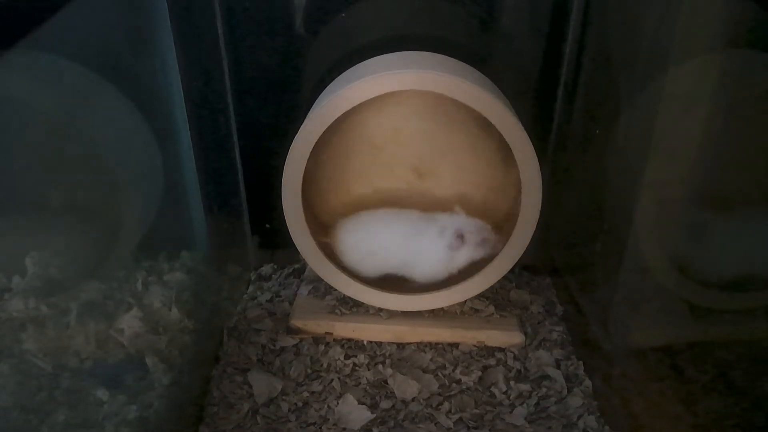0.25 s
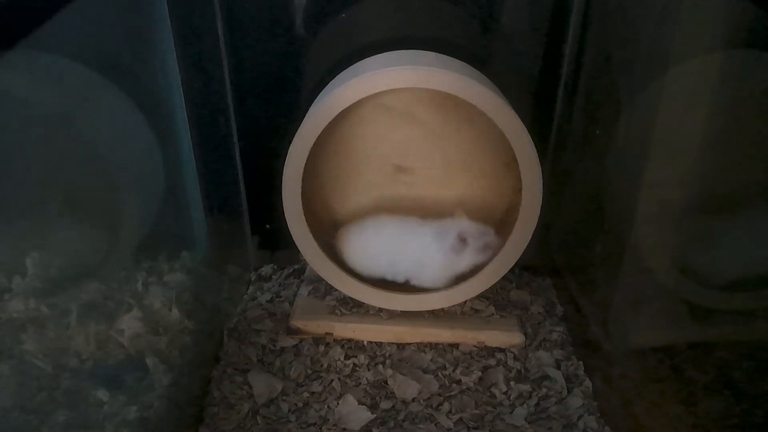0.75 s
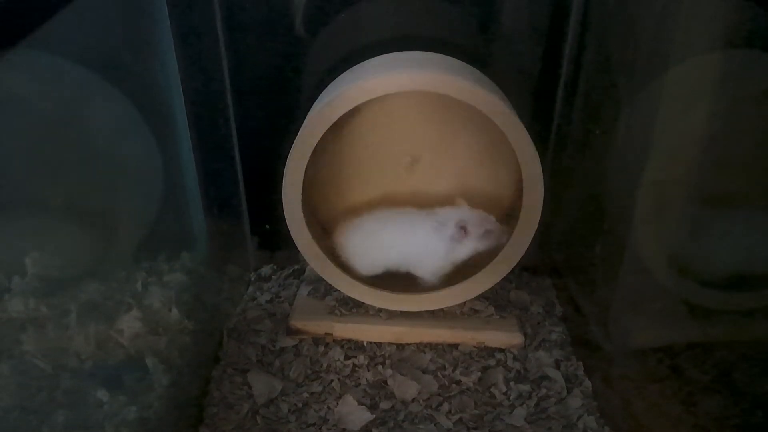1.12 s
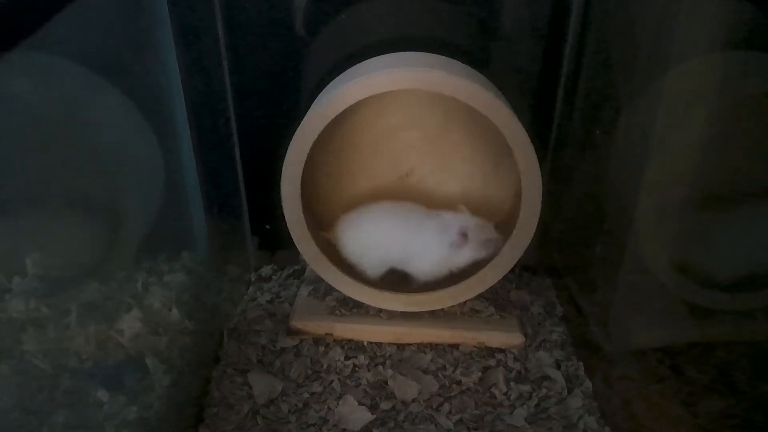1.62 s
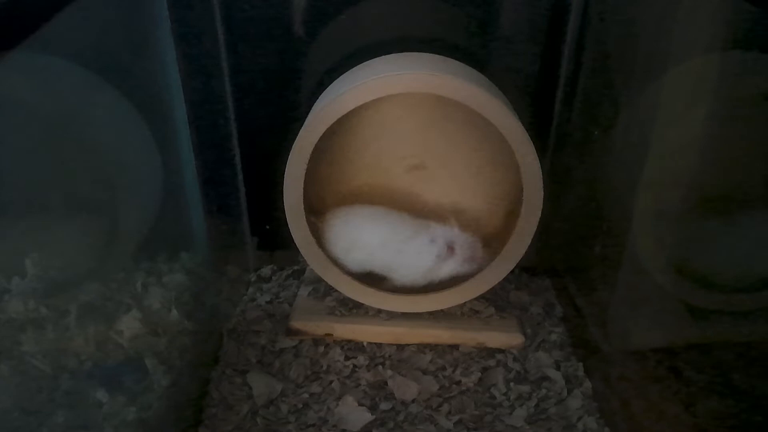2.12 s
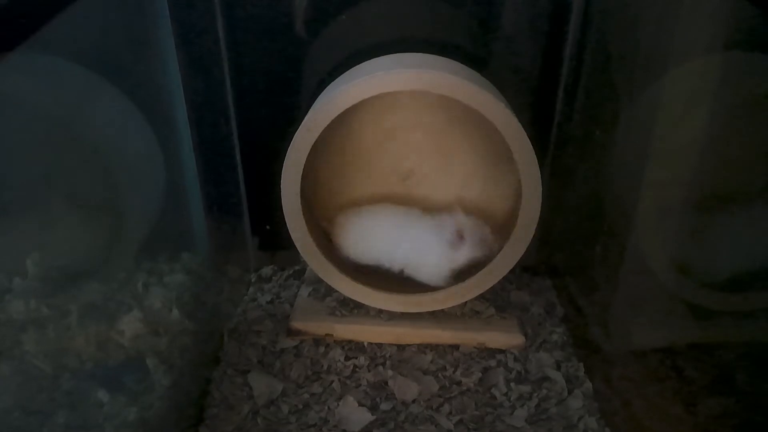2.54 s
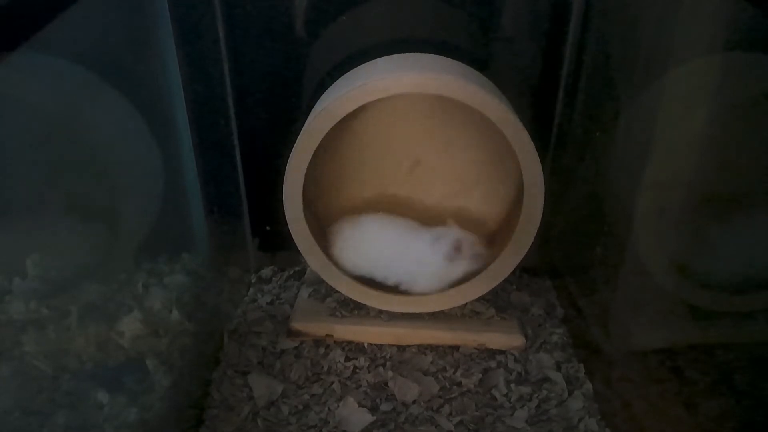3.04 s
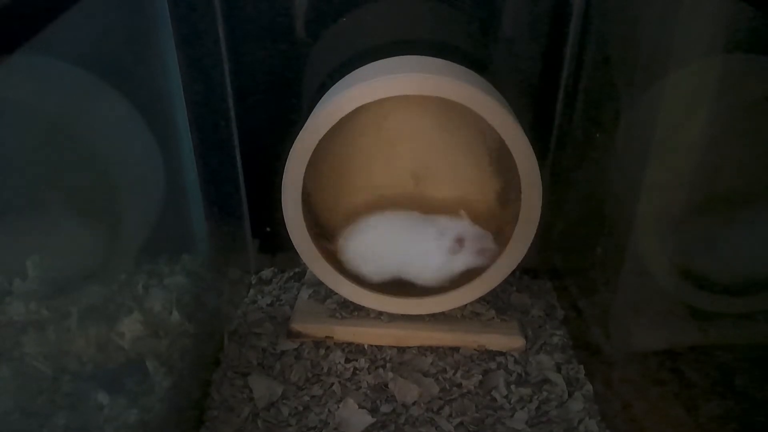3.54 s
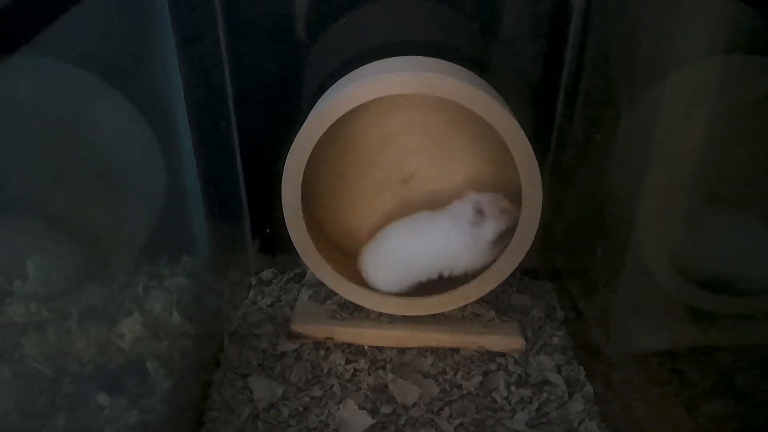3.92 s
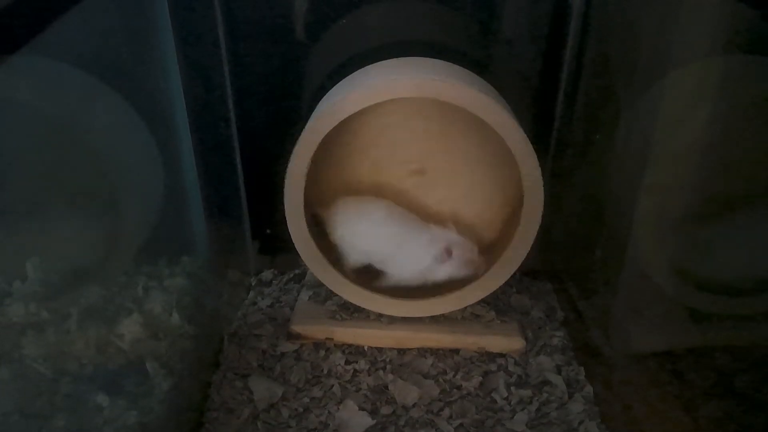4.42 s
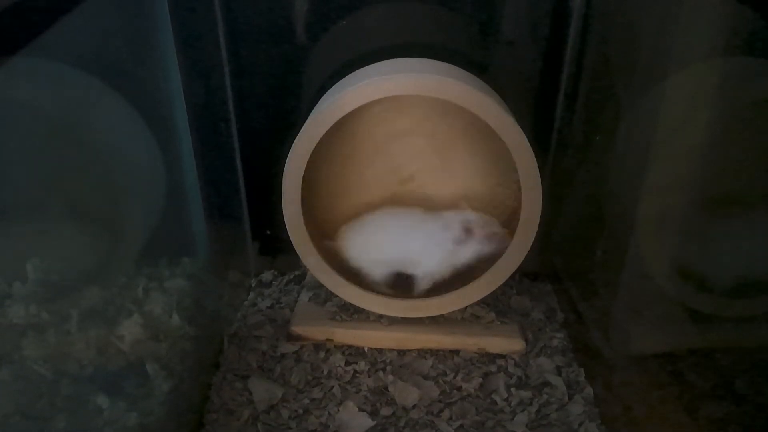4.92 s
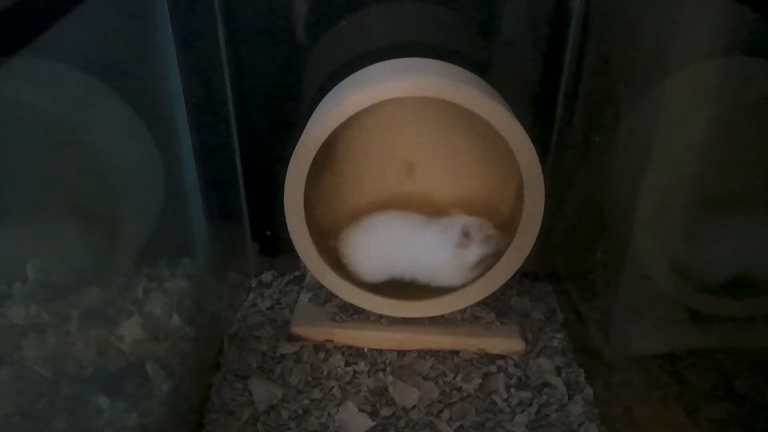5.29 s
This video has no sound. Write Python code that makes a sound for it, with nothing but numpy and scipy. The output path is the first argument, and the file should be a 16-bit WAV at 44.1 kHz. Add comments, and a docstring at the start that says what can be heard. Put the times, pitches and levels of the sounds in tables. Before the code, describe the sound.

Close up, a hamster runs in a hollow wooden wheel. Light irregular claw ticks and soft fur brushing come first, then harder paw thumps and rumbling, a calmer spell, and another short burst of thumps. Faint squeaks and taps appear among them. A steady low hum and gentle ventilation noise fill the quiet room; stereo microphone beside a glass tank.

```python
"""Close beside a glass tank in a quiet room, a two-port stereo microphone hears a hamster in a wooden wheel.
From the start a mains hum and air noise lie under ticking claws (noise grit and a ring), brushing fur,
faint axle squeaks and short pitched taps of the wood (roughened tones). From about 1.4 s the run grows hard:
paws thump the drum (pushes into decaying modes) over rumbling noise. It eases near 2.9 s, then thumps again
from about 4.3 to 4.9 s. Last come a few claw ticks and scuffs (noise swells), with the rumble rising."""
import sys
import numpy as np
from scipy import signal
from scipy.fft import rfft, irfft, next_fast_len
from scipy.io import wavfile

SR = 44100
rng = np.random.default_rng(int(sys.argv[2]) if len(sys.argv) > 2 else 0)


def inscribe(sig):
    """Save sig as 16-bit PCM at rate SR to the path in sys.argv[1].

    A 1-D sig is mono; a 2-D sig holds one channel per row.
    Samples are clipped to [-1, 1] before scaling.
    """
    pcm = np.round(np.clip(np.atleast_2d(sig).T, -1, 1) * 32767)
    wavfile.write(sys.argv[1], SR, pcm.astype(np.int16))


N = 245195
TIME = np.arange(N) / SR
SURGE_HZ = 12  # fastest rate of the random surges


def amp(db):
    """Turns dB into an amplitude factor."""
    return 10 ** (np.asarray(db) / 20)


def unit(x):
    """Scales to rms 1."""
    return x / np.sqrt(np.mean(x ** 2) + 1e-20)


def curve(rows):
    """Draws a time curve at every sample."""
    return np.interp(TIME, *np.transpose(rows))


def across(points, size):
    """Reads a spectrum table at the bins of an FFT of this size, along log frequency."""
    hz, value = np.transpose(points)
    bins_hz = np.fft.rfftfreq(size, 1 / SR)
    return np.interp(np.log(bins_hz + 1), np.log(hz + 1), value)


def colour(x, points, lead=((1, 0), (2, 0))):
    """Filters by a table of (Hz, dB), and turns the phase by a table of (Hz, radians)."""
    size = next_fast_len(N + 4096)
    response = amp(across(points, size)) * np.exp(1j * across(lead, size))
    return irfft(rfft(x, size) * response, size)[..., :N]


def highpass(x, hz):
    """Removes the sound below an edge, at 24 dB an octave."""
    return signal.sosfilt(signal.butter(4, hz, "high", fs=SR, output="sos"), x)


def noise():
    """Draws two unrelated channels of white noise."""
    return rng.standard_normal((2, N))


def drift(rate_hz):
    """Wanders at random with rms 1, mostly slower than the given rate."""
    size = 4096
    hz = np.fft.rfftfreq(size, N / SR / size)
    slow = irfft(rfft(rng.standard_normal(size)) / (1 + (hz / rate_hz) ** 4))
    return unit(np.interp(TIME, np.linspace(0, N / SR, size), slow))


def add(mix, s, sound):
    """Mixes a sound in place from s seconds on."""
    part = mix[..., max(round(s * SR), 0):][..., :sound.shape[-1]]
    part += sound[..., :part.shape[-1]]


# Likeness of the two microphone ports. Each row: frequency in Hz, correlation from -1 to 1.
PORT_LIKENESS = [(20, .97), (180, .97), (330, .93), (550, .62), (1000, -.15), (2000, -.1), (5000, 0)]


def spread(pair):
    """Two unrelated signals become a stereo pair that shares its bass."""
    size = next_fast_len(N + 4096)
    a, b = rfft(pair, size)
    alike = across(PORT_LIKENESS, size)
    mid = a * np.sqrt((1 + alike) / 2)
    side = b * np.sqrt((1 - alike) / 2)
    return irfft([mid + side, mid - side], size)[:, :N]


TANK_ABOVE_HZ = 500  # lower edge of the reflections; below it the sound stays dry


def tank(x, t60, wet_db):
    """Dense reflections between the glass walls, different at each port; the bass stays dry."""
    t = np.arange(SR // 2) / SR
    tail = rng.standard_normal((2, len(t))) * np.exp(-np.log(1000) * t / t60) * (t > .002)
    tail /= np.linalg.norm(tail, axis=1, keepdims=True)
    tail = highpass(tail, TANK_ABOVE_HZ)
    reflected = signal.oaconvolve(np.atleast_2d(x), tail, axes=1)[:, :N]
    return x + amp(wet_db) * spread(reflected)


def push(contact_s):
    """A smooth push of unit area."""
    shape = np.sin(np.pi * np.minimum(np.arange(1024) / SR / contact_s, 1)) ** 2
    return shape / shape.sum()


# Modes of the hollow drum on its stand, before any variation from spot to spot.
# Each row: frequency in Hz, relative level in dB, 60 dB decay time in seconds.
DRUM_MODES = [(140, -5.3, 0.15), (166, -3.8, 0.15), (322, -13, 0.09), (352, -2, 0.08), (420, 0.5, 0.075),
              (572, -6, 0.05), (700, -9, 0.06), (805, -15, 0.034), (933, -1, 0.07)]
MODE_SPREAD_DB, MODE_DETUNE = 2.0, .015  # largest change of level and share of pitch from paw to paw


def drum(force, varied=0, radiate_hz=95):
    """The hollow wheel rings in its modes, varied from spot to spot; it is too small to radiate deep bass."""
    t = np.arange(SR // 4) / SR
    ring = np.zeros(len(t))
    chance = varied * rng.uniform(-1., 1., (len(DRUM_MODES), 2))
    for (hz, db, t60), (louder, sharper) in zip(DRUM_MODES, chance):
        mode = np.sin(2 * np.pi * hz * (1 + MODE_DETUNE * sharper) * t)
        ring += amp(db + MODE_SPREAD_DB * louder) * 1e-3 ** (t / t60) * mode
    return signal.oaconvolve(force, highpass(ring, radiate_hz))[:N]


# Footfalls that knock the drum against its stand. Each row: start in seconds, relative level of the knock
# in dB, relative level of the body weight that follows in dB, contact time in seconds (long is dull).
FOOTFALLS = [(0.17, -38, -68, 0.0022), (0.81, -48, -65, 0.0014), (1.018, -36, -54, 0.0019),
             (1.112, -66, -40, 0.0014), (1.491, -34.5, -34, 0.0023), (1.536, -38.5, -43, 0.0025),
             (1.647, -50.5, -42, 0.0015), (1.783, -27.5, -34, 0.0019), (1.7948, -46, -45, 0.0015),
             (1.822, -40, -38, 0.0029), (1.843, -36, -49, 0.0017), (1.877, -48, -37, 0.0024),
             (1.937, -50, -41, 0.0024), (2.002, -44, -50, .0015), (2.0102, -33, -42, 0.002),
             (2.077, -44, -40, 0.0015), (2.278, -57, -50, 0.0013), (2.379, -35, -30, 0.0022),
             (2.3954, -30.5, -29, 0.002), (2.428, -37, -41, .003), (2.451, -35.5, -40, 0.0026),
             (2.465, -38, -28, 0.0017), (2.489, -40, -32, 0.0018), (2.527, -36, -45, 0.0024),
             (2.548, -73, -31, 0.0019), (2.888, -52, -57, 0.0022), (3.282, -44, -68, 0.0023),
             (3.428, -34, -39, 0.0027), (4.289, -37, -31, 0.0026), (4.516, -46, -27.5, 0.0021),
             (4.579, -48, -33, 0.0014), (4.644, -42, -34.5, 0.0024), (4.8335, -28, -34, 0.0017),
             (4.893, -42.5, -38, 0.0023)]
WEIGHT_S, SETTLE_S = 0.0052, 0.01176  # contact time of the weight, and its delay after the knock
REBOUND_S, REBOUND_DB = 0.005964, -4  # the drum drops back on its stand: mean delay, level to the knock
REBOUND_SCATTER = .03  # largest share by which that delay varies


def thumps(knock_db=0.4, weight_db=-0.7):
    """A short knock reaches the higher modes and rebounds; then the body's weight lands, soft and low."""
    out = np.zeros(N)
    for s, db, body_db, contact_s in FOOTFALLS:
        force = np.zeros(2048)
        knock = amp(db + knock_db) * push(contact_s)
        rebound_s = REBOUND_S * (1 + REBOUND_SCATTER * rng.uniform(-1, 1))
        add(force, 0, knock)
        add(force, rebound_s, amp(REBOUND_DB) * knock)
        add(force, SETTLE_S, amp(body_db + weight_db) * push(WEIGHT_S))
        add(out, s, drum(force, varied=1))
    return tank(out, t60=0.042, wet_db=-3)


# The dry wooden edge of a hard knock. Each row: frequency in Hz, relative level in dB.
CRACK_COLOUR = [(300, -30), (700, 11), (1000, 3), (1600, 2), (2600, -10), (6000, -40)]


def cracks(level_db=-24.5, decay_s=0.018, hard_db=-28, steepness=1.6):
    """Knocks also rattle the stand, as decaying noise; the rattle grows faster than the blow."""
    t = np.arange(4096) / SR
    envelope = np.zeros(N)
    for s, db, *_ in FOOTFALLS:
        rattle_db = hard_db + level_db + steepness * (db - hard_db)
        add(envelope, s, amp(rattle_db) * np.exp(-t / decay_s))
    return envelope * unit(colour(spread(noise()), CRACK_COLOUR))


# Claws that drag. Each row: start in seconds, length in seconds, mean relative level in dB,
# middle pitch in Hz, relative treble in dB.
CLAW_DRAGS = [(1.247, .024, -61, 4600, -11), (1.815, .012, -45.5, 5120, -18), (2.578, .008, -48, 3960, -16),
              (3.397, .011, -51, 4820, -17), (3.431, .015, -52, 4000, -16), (4.035, .024, -52, 4880, -13),
              (4.085, .009, -49, 2500, -24), (4.487, .008, -49, 4440, -16), (4.773, .016, -53.5, 5330, -13),
              (4.883, .014, -44, 4290, -16), (5.17, .009, -48.5, 3850, -22), (5.297, .02, -52, 4060, -16),
              (5.447, .009, -61, 3870, -18)]
SLIP_GAP_S, SLIP_DECAY_S, SLIP_SPREAD_DB, SLIP_RING_DB = .003, 0.0022, 4, -7


def skids():
    """Each drag is a quick, uneven run of slips, as rows like those of CLAW_STRIKES."""
    rows = []
    for s, length, db, hz, treble_db in CLAW_DRAGS:
        chance = rng.uniform(-1, 1, (32, 3))
        slips = chance[:int(length / SLIP_GAP_S) + 1]
        for k, (late, force, spot) in enumerate(slips):
            slip_s = s + (k + late / 3) * SLIP_GAP_S
            slip_db = db + SLIP_SPREAD_DB * force
            rows.append((slip_s, slip_db, hz * 2 ** (spot / 2), treble_db, SLIP_DECAY_S, SLIP_RING_DB))
    return rows


# the faintest touches: relative level and its spread, pitch, relative treble, decay time
CRACKLE_DB, CRACKLE_SPREAD_DB = -66, 6
CRACKLE_HZ, CRACKLE_TREBLE_DB, CRACKLE_DECAY_S = 3370, -16, 0.0013


def crackle(count=130):
    """Faint touches of the claws at random moments, as rows like those of CLAW_STRIKES."""
    rows = []
    for when, force, spot in rng.uniform(-0.87, 1, (count, 3)):
        s = (when + 1) / 2 * N / SR
        db = CRACKLE_DB + CRACKLE_SPREAD_DB * force
        hz = CRACKLE_HZ * 2 ** (spot / 2)
        rows.append((s, db, hz, CRACKLE_TREBLE_DB, CRACKLE_DECAY_S, SLIP_RING_DB))
    return rows


# The clearest claw strikes on the wood. Each row: start in seconds, relative level in dB, pitch of the spot
# in Hz, relative treble in dB, nominal decay time in seconds, ring against the grit in dB.
CLAW_STRIKES = [(.0239, -52, 5270, -22, 0.0023, -6), (.1294, -47, 5200, -11, .003, -11),
                (.2035, -49, 6100, -13, .0035, -18), (.2817, -42.5, 4910, -26, 0.0022, -6),
                (.323, -48, 3700, -12, .0025, -10), (.4417, -47, 4870, -9, .003, -8),
                (.4856, -45, 3230, -19, 0.0026, -22), (.5995, -46, 5750, -24, .0014, -3),
                (.6025, -47.5, 4870, -24, 0.0022, -4), (.6494, -49, 3830, -24, 0.0016, 0),
                (.782, -50, 5250, -10, .003, -10), (.8003, -44.5, 2920, -24, 0.0021, -7),
                (.801, -48, 4400, -22, 0.0022, 0), (.9255, -45.5, 4860, -23, .0033, -14),
                (.971, -46, 2760, -25, 0.0023, -11), (1.1113, -43.5, 5230, -16, 0.0029, -14),
                (1.1855, -49.5, 5150, -25, 0.0033, -5), (1.2593, -50, 5500, -14, .003, -5),
                (1.2793, -44.5, 4260, -20, 0.0021, -5), (1.3775, -46, 2900, -16, 0.003, -15),
                (1.4023, -44, 2400, -9, .0025, -10), (1.4615, -45.5, 5850, -18, 0.003, -12),
                (1.5695, -42, 4760, -32, 0.0021, -5), (1.606, -43, 5330, -19, 0.002, -16),
                (1.6906, -45, 5100, -18, 0.0034, -10), (1.7228, -62, 3400, -11, 0.0018, -12),
                (1.8192, -49, 3780, -18, 0.0044, -5), (1.8245, -46, 4950, -15, .003, -1),
                (1.8285, -44.5, 3000, -18, 0.0028, -5), (1.9228, -49, 6010, -21, 0.0029, -1),
                (2.055, -45, 4400, -13, 0.0032, -9), (2.0916, -44.5, 2590, -13, .0022, -9),
                (2.183, -46, 5000, -17, .0026, -16), (2.3222, -46, 2700, -13, .0035, -14),
                (2.3435, -43.5, 5660, -22, 0.0029, -18), (2.4203, -44, 3750, -18, .003, -7),
                (2.5537, -52, 5760, -20, .0025, -6), (2.5873, -48, 4200, -16, 0.0024, -20),
                (2.7, -53, 2620, -24, 0.0033, -5), (2.7512, -46.5, 3710, -28, 0.0038, -1),
                (2.8385, -49, 5430, -17, .003, -12), (2.8704, -47, 2710, -10, 0.0033, -3),
                (3.0944, -44.5, 3300, -19, 0.0027, -7), (3.0948, -43, 6120, -24, 0.0021, -1),
                (3.0955, -49, 5250, -24, .0019, -3), (3.3288, -48.5, 3360, -22, 0.0023, -12),
                (3.553, -45, 4520, -10, 0.003, -17), (3.7165, -43.5, 5100, -20, 0.0025, -10),
                (3.7819, -46, 2600, -11, .002, -13), (3.8833, -53, 4600, -16, .003, -8),
                (4.0773, -47, 2470, -21, 0.0022, -16), (4.0958, -47, 3510, -24, 0.01, -11),
                (4.1862, -45.5, 5070, -18, 0.0031, -13), (4.2313, -49, 2970, -14, .002, -8),
                (4.349, -45.5, 4020, -10, 0.0032, -5.5), (4.3935, -40, 3140, -30, 0.0017, -4),
                (4.3938, -45.5, 4430, -30, .0015, 0), (4.6435, -45, 5000, -23, 0.0027, -10),
                (4.7255, -52, 4960, -19, 0.0036, -10), (4.9952, -50, 4040, -14, 0.0032, -22),
                (5.417, -41, 4000, -28, 0.0014, -5), (5.4172, -42.5, 5700, -28, 0.0015, -6),
                (5.4312, -43.5, 3610, -18, 0.0031, 8)]
# Body of the grit. Each row: frequency in Hz, relative level in dB.
GRIT_BODY = [(700, -2), (1500, 8.5), (2500, -2), (5800, -4), (7200, 4.5), (9000, 0)]
# Treble of the grit. Each row: frequency in Hz, relative level in dB.
GRIT_TREBLE = [(5000, -30), (7500, -3), (10000, 0), (15500, 0)]
CLAW_RISE_S, CLAW_ALIKE = 0.00081, .3  # onset time; share of the grit's power that both ports hear alike
SPOT_DB, SPOT_OCTAVES = 8.5, 1  # grit is lifted around the pitch of the spot, over this width
SPOT_RING_DB = 2  # a spot that rings well colours the grit more
GRIT_LONGEST_S, RING_OUTLASTS = .003, 1.2  # cap on the grit's decay; the ring's decay in nominal decay times


def claws(level_db=3, treble_level_db=13):
    """A claw strikes: a dry burst of grit, coloured by the spot it hits; that spot rings on a little longer."""
    size = 2048
    out, t = np.zeros((2, N)), np.arange(size) / SR
    bins_hz = np.fft.rfftfreq(size, 1 / SR) + 1
    body = amp(across(GRIT_BODY, size))
    treble = unit(amp(across(GRIT_TREBLE, size)))
    for s, db, hz, treble_db, decay, ring_db in list(CLAW_STRIKES) + crackle() + skids():
        nearness = np.exp(-(np.log2(bins_hz / hz) / SPOT_OCTAVES) ** 2)
        spot = amp((SPOT_DB + SPOT_RING_DB * amp(ring_db)) * nearness)
        tone = np.hypot(unit(body * spot), amp(treble_db + treble_level_db) * treble)
        white = rng.standard_normal((3, size))
        ports = np.sqrt(CLAW_ALIKE) * white[0] + np.sqrt(1 - CLAW_ALIKE) * white[1:]
        grit = irfft(rfft(ports) * tone)
        phase = rng.random((2, 1)) / 2  # in turns, another at each port
        ring = amp(ring_db) * np.sqrt(2) * np.sin(2 * np.pi * (hz * t + phase))
        tick = grit * np.exp(-t / min(decay, GRIT_LONGEST_S)) + ring * np.exp(-t / (RING_OUTLASTS * decay))
        rise = 1 - np.exp(-t / CLAW_RISE_S)
        add(out, s, amp(db + level_db) * rise * tick / np.std(grit + ring))
    return tank(out, t60=.07, wet_db=-6)


# How hard the wheel is driven. Each row: time in seconds, relative level in dB.
WHEEL_DRIVE = [(0, -56), (.8, -60), (1.4, -50.5), (2.0, -49.5), (2.6, -49), (3.2, -53), (3.7, -56),
               (4.3, -47), (4.8, -50), (5.1, -52.5), (5.55, -46)]


def patter(contact_hz=300, stir_db=-2, surge_db=4.0, steps_per_s=75):
    """Many light footfalls at random keep the drum rumbling, in uneven surges."""
    steps = (rng.random(N) < steps_per_s / SR) * amp(surge_db * drift(SURGE_HZ))
    soft = signal.sosfilt(signal.butter(2, contact_hz, fs=SR, output="sos"), steps)
    return amp(curve(WHEEL_DRIVE) + stir_db) * unit(tank(drum(soft), t60=0.037, wet_db=-3.5))


# How firmly fur and paws brush the wood. Each row: time in seconds, relative level in dB.
BRUSH_PRESSURE = [(0.0, -61), (0.97, -61), (1.39, -60.5), (3.24, -60), (3.89, -61), (4.85, -59.5),
                  (5.56, -59.5)]
# Colour of the rub. Each row: frequency in Hz, relative level in dB.
RUB_COLOUR = [(400, -45), (900, 5.5), (1900, 14), (2700, 6), (5500, 7.5), (7500, 3), (10000, 1.5)]
# Colour of the finest part of the brushing. Each row: frequency in Hz, relative level in dB.
FIZZ_COLOUR = [(4500, -7), (7500, -0.5), (10000, 0), (15500, -3)]
SCRATCH_LIMIT = 2.2  # soft limit on scratches that pile up (times the rms)


def brushing(grain_db=-5, grains_per_s=70, grain_decay_s=.006, fizz_db=-1, fizz_grain_db=-6, surge_db=1.13):
    """A soft rub of fur on wood that swells and ebbs unevenly, with tiny scratches and a fine fizz."""
    hits = (rng.random(N) < grains_per_s / SR) * rng.uniform(.2, 1, N)
    scratches = unit(signal.lfilter([1], [1, -np.exp(-1 / (grain_decay_s * SR))], hits))
    scratches = SCRATCH_LIMIT * np.tanh(scratches / SCRATCH_LIMIT)
    pressure = amp(curve(BRUSH_PRESSURE) + surge_db * drift(SURGE_HZ))
    rub = np.hypot(1, amp(grain_db) * scratches) * unit(colour(noise(), RUB_COLOUR))
    fizz = np.hypot(1, amp(fizz_grain_db) * scratches) * unit(colour(noise(), FIZZ_COLOUR))
    return pressure * (rub + amp(fizz_db) * fizz)


# Longer scuffs of a sliding paw. Each row: middle in seconds, length in seconds, level in dB, lower edge in Hz.
PAW_SCUFFS = [(1.237, 0.25, -56.5, 3560), (1.733, 0.12, -58.5, 7000), (1.96, 0.24, -57, 6000),
              (2.512, 0.33, -58.5, 2950), (5.248, 0.2, -58, 11000)]


def scuffs():
    """A paw slides: a soft swell of high hiss."""
    out = np.zeros((2, N))
    for s, length, db, edge_hz in PAW_SCUFFS:
        swell = signal.windows.hann(round(length * SR))
        hiss = unit(highpass(rng.standard_normal((2, SR)), edge_hz))
        add(out, s - length / 2, amp(db) * swell * hiss[:, :len(swell)])
    return out


# Squeaks of the axle, and short pitched taps and rings of the wood. Each row: middle in seconds,
# length in seconds, pitch in Hz, relative level in dB, glide as a share of the pitch,
# rasp as a share of the power from 0 to 1.
SQUEAKS_AND_TAPS = [(.29, .023, 1900, -60, 0, .5), (.749, .085, 1475, -60.5, .1, .35),
                    (1.248, .07, 1595, -58.5, .03, .35), (1.285, .026, 1590, -61, 0, .4),
                    (1.384, .013, 1220, -54.5, 0, .25), (1.402, .012, 1236, -56, .05, .25),
                    (3.02, .02, 2010, -69, 0, .5), (4.083, .014, 1990, -56, 0, .4),
                    (4.496, .015, 1822, -56, .017, .35), (4.997, .032, 1760, -60.5, -.02, .4)]


def squeaks_and_taps(level_db=3):
    """Thin, nearly level squeaks of the axle and short pitched taps of the wood: tones partly roughened."""
    out = np.zeros(N)
    wobble = .008 * drift(150)  # share of the pitch
    flutter = (drift(260) + 1j * drift(260)) / np.sqrt(2)
    for s, length, hz, db, glide, rasp in SQUEAKS_AND_TAPS:
        u = np.clip((TIME - s) / length, -.5, .5)
        turn = np.exp(2j * np.pi * np.cumsum(hz * (1 + glide * u + wobble)) / SR)
        note = (turn * (np.sqrt(1 - rasp) + np.sqrt(rasp) * flutter)).real
        out += amp(db + level_db) * np.cos(np.pi * u) * note
    return tank(out, t60=.06, wet_db=-6)


# Deep shaking of the tank floor. Each row: frequency in Hz, relative level in dB per Hz.
FLOOR_COLOUR = [(15, -16), (24, -4), (32, -8), (50, 1), (63, 3), (78, -7), (100, -4.5), (140, -8),
                (300, -55), (1000, -82)]


def rumble(level_db=-55.5, follow=0.57, surge_db=2):
    """The stand and the tank floor shake in uneven surges, more so when the wheel is driven hard."""
    drive_db = curve(WHEEL_DRIVE)
    shake_db = level_db + follow * (drive_db - drive_db.mean()) + surge_db * drift(SURGE_HZ)
    return amp(shake_db) * unit(colour(spread(noise()), FLOOR_COLOUR))


# Hum of an appliance, the main tone first. Each row: frequency in Hz, relative rms level in dB.
HUM_LINES = [(120, -44), (129.5, -55.5), (180, -65), (241, -70), (300, -59), (360, -63.5), (420, -68.5),
             (480, -70.5), (560, -69.5), (662, -73.5), (721, -72), (1066, -82), (1802, -80.5),
             (1926, -80.5), (2074, -77), (2104, -78)]
# Swell of the main tone. Each row: time in seconds, change in dB.
MAIN_SWELL = [(0, -3.5), (.8, -0.5), (2.2, -.5), (3, 1), (5.5, 2)]
# Level of the hum's high whine. Each row: time in seconds, change in dB.
WHINE_SWELL = [(0, 0), (1.2, 1), (1.5, 10), (1.85, 6), (2.1, 0), (2.35, 8.5), (2.6, 2), (2.85, -14),
               (3.3, 7), (3.8, -4), (5.56, 2)]
WHINE_ABOVE_HZ, WHINE_BLUR, WHINE_BLUR_HZ = 2000, 1.0, 90  # lower edge; phase wander in rad rms and its rate


def hum(waver_db=1.3, upper_db=-2.0, upper_waver_db=3.0, phase_waver=.7):
    """A firm mains tone beats against a near neighbour; fainter lines waver above, blurred at the top."""
    (main_hz, main_db), *upper = HUM_LINES
    main_level = amp(main_db + curve(MAIN_SWELL) + waver_db * drift(22.0))
    out = main_level * np.sin(2 * np.pi * main_hz * TIME)
    for hz, db in upper:
        phase = phase_waver * drift(3.44)
        if hz > WHINE_ABOVE_HZ:
            db = db + curve(WHINE_SWELL)
            phase = phase + WHINE_BLUR * drift(WHINE_BLUR_HZ)
        level = amp(db + upper_db + upper_waver_db * drift(10.0))
        out += level * np.sin(2 * np.pi * hz * TIME + phase)
    return np.sqrt(2) * out  # from rms to peak


# Steady air noise of the room. Each row: frequency in Hz, relative level in dB per Hz.
AIR_COLOUR = [(60, -7.5), (130, 14), (170, -1.5), (205, -7), (320, -6), (480, -1.5), (900, -8), (2000, -20),
              (2700, -18.5), (6000, -24), (9000, -53)]


def air(level_db=-52.0):
    """Ventilation noise thinning into a fine hiss."""
    return amp(level_db) * unit(colour(spread(noise()), AIR_COLOUR))


def scene():
    """All that reaches the microphone, from the wheel to the room."""
    wheel = thumps() + cracks() + patter() + rumble() + squeaks_and_taps()
    animal = claws() + scuffs() + brushing()
    return wheel + animal + hum() + air()


# Colour of the left microphone port. Each row: frequency in Hz, level in dB.
LEFT_PORT = [(50, 0), (330, -1), (700, -.3), (1500, 0), (4400, -1.3), (6000, 1.5), (7600, -7), (8800, -5),
             (10000, 1), (10900, -2), (11900, 2.5), (13000, .5), (14500, -4)]
# Colour of the right microphone port, dull in the treble. Each row: frequency in Hz, level in dB.
RIGHT_PORT = [(50, .3), (330, 1), (700, .4), (1500, .6), (2600, .8), (4400, 1.8), (5300, 2.3), (6200, -1),
              (7000, -7), (8200, -15), (15000, -16)]
# Phase added at the left port, negative where it trails. Each row: frequency in Hz, phase in radians.
LEFT_PHASE = [(20, 0), (120, -.2), (330, -.18), (700, 0)]
EDGE_HZ = 15850  # top of the microphone's band


def record(dry):
    """Each port adds its colour, the left also turns the phase of its bass; then the band limit."""
    left = colour(dry[0], LEFT_PORT, LEFT_PHASE)
    right = colour(dry[1], RIGHT_PORT)
    edge = signal.firwin(801, EDGE_HZ, window=("kaiser", 9), fs=SR)
    return signal.oaconvolve(np.array([left, right]), edge[None], "same")


dry = scene()
out = record(dry)
inscribe(out)
```